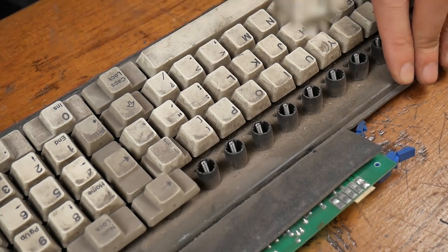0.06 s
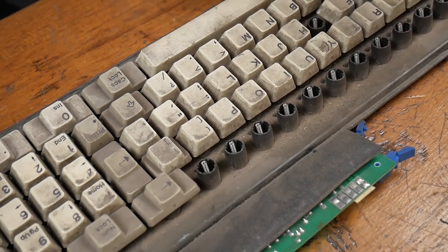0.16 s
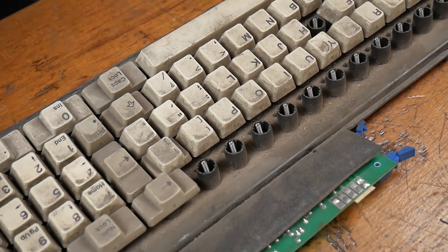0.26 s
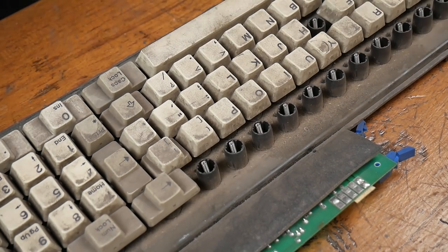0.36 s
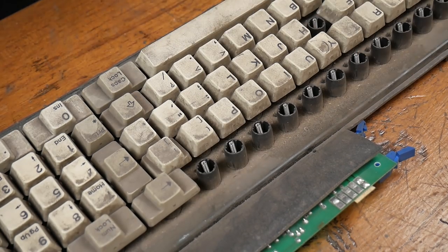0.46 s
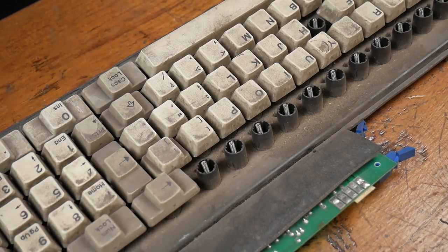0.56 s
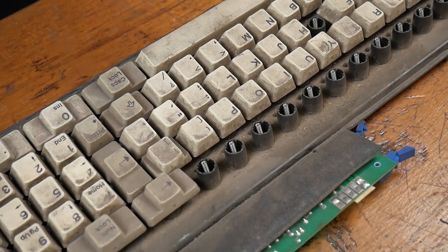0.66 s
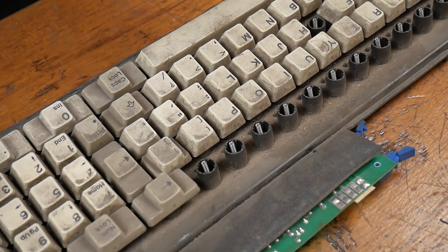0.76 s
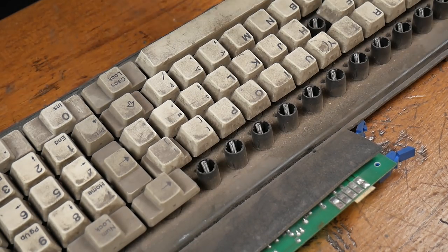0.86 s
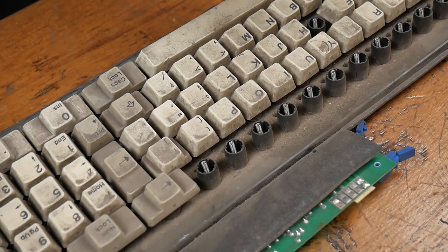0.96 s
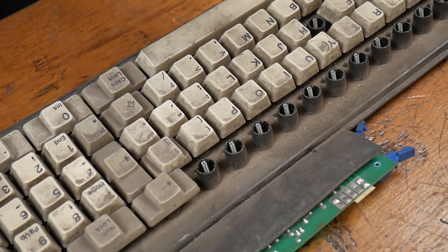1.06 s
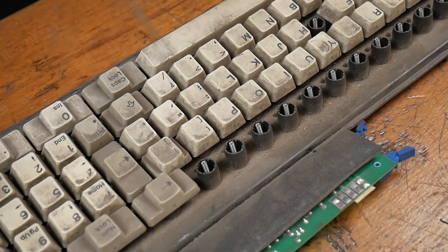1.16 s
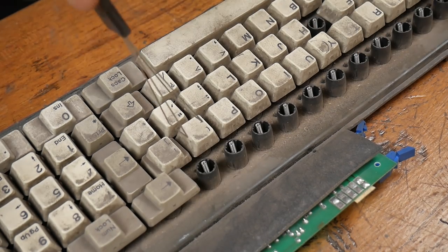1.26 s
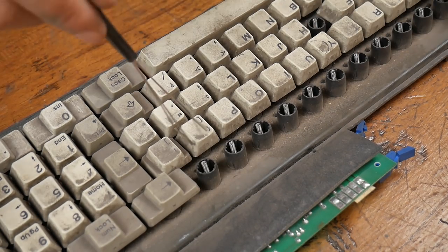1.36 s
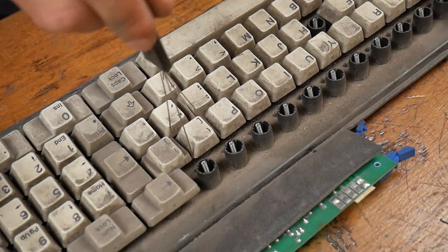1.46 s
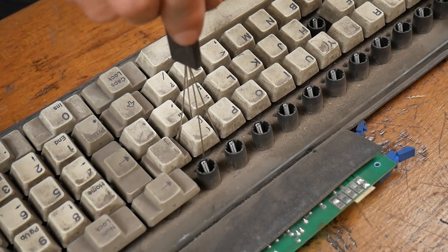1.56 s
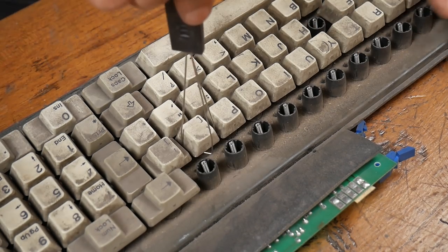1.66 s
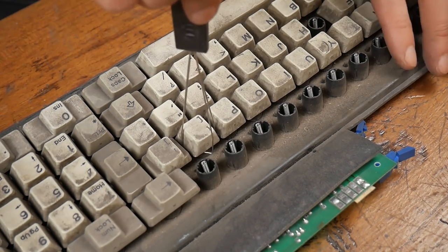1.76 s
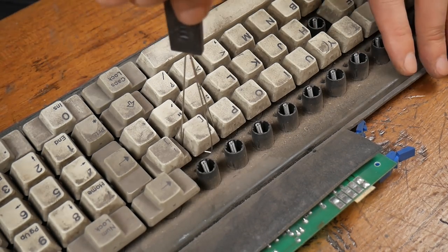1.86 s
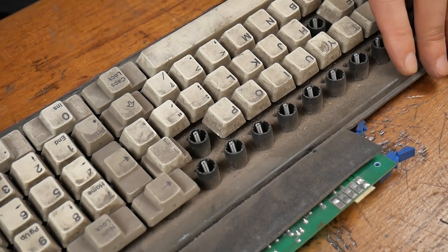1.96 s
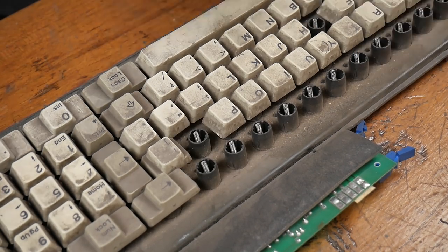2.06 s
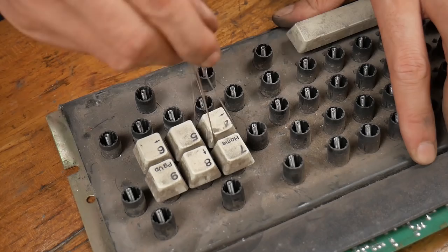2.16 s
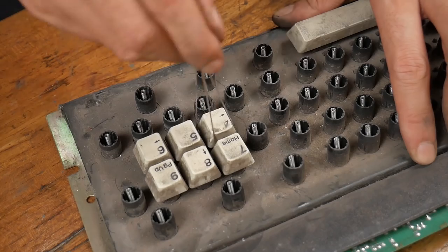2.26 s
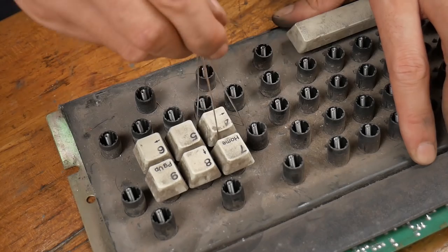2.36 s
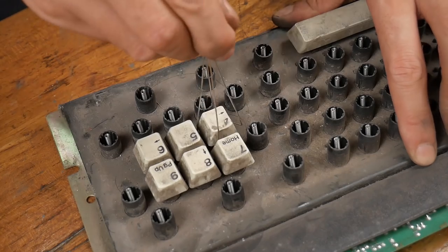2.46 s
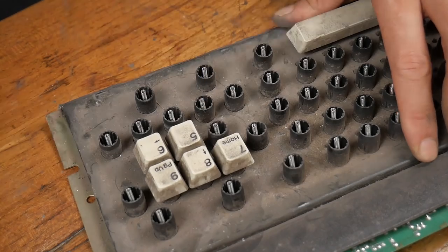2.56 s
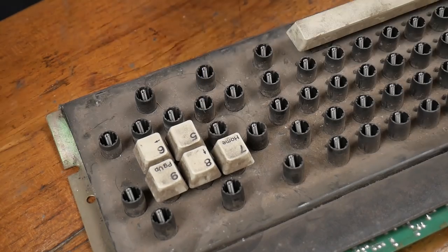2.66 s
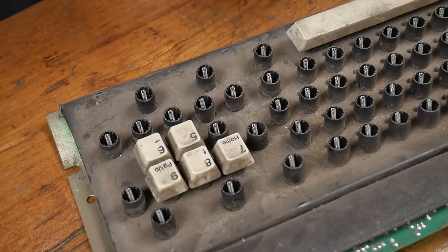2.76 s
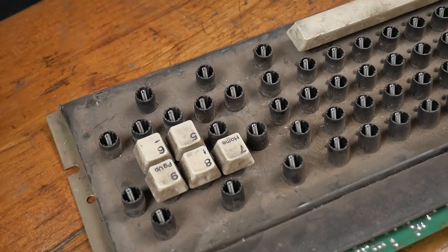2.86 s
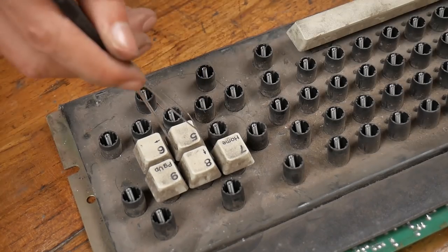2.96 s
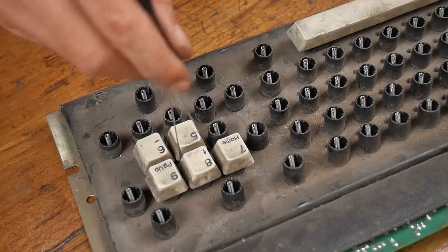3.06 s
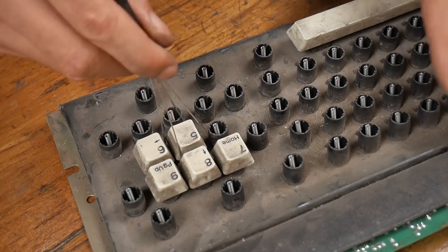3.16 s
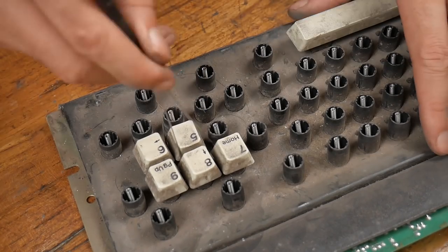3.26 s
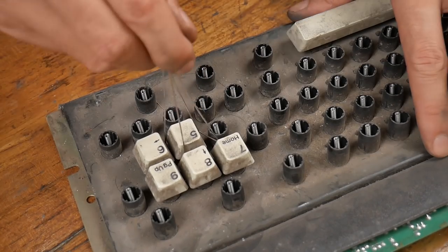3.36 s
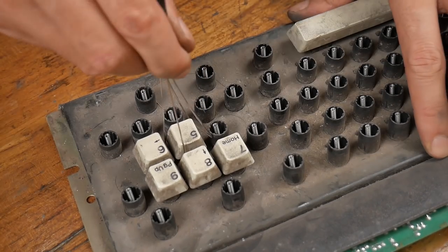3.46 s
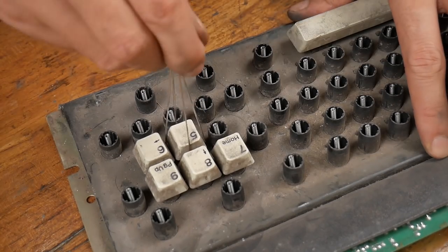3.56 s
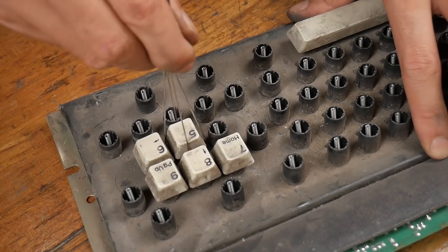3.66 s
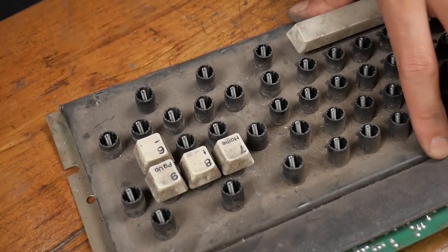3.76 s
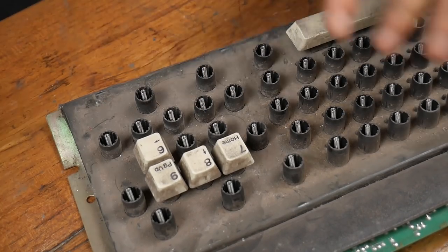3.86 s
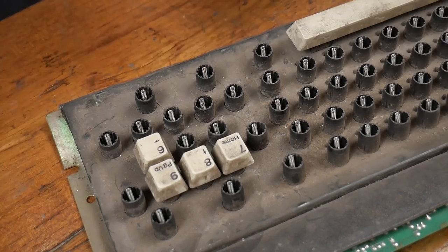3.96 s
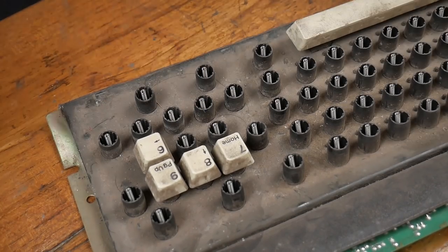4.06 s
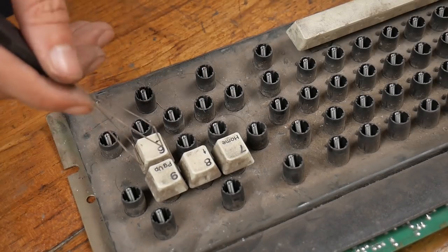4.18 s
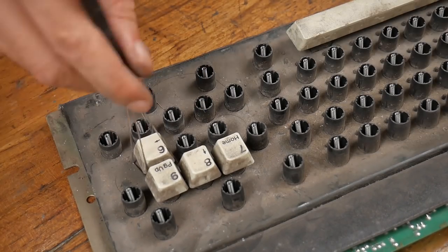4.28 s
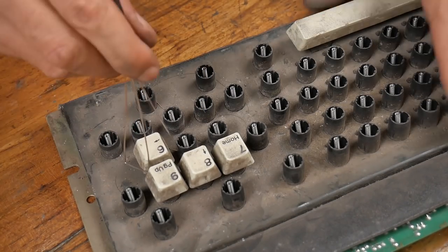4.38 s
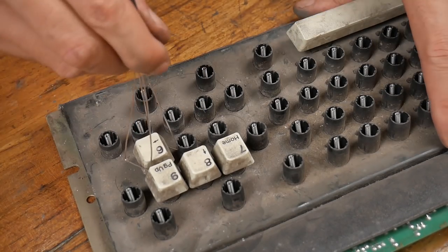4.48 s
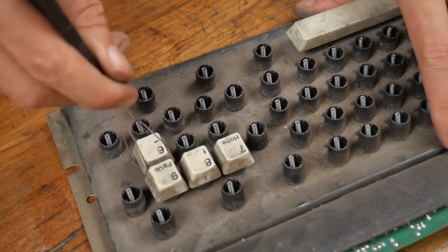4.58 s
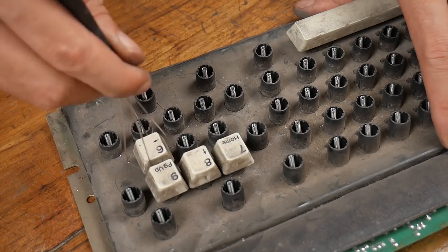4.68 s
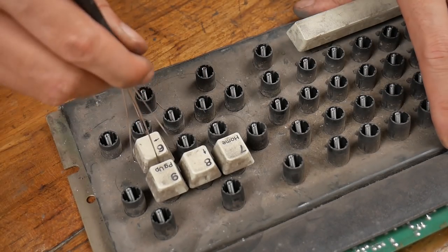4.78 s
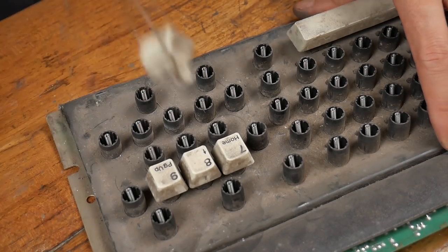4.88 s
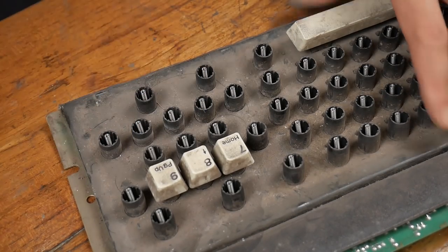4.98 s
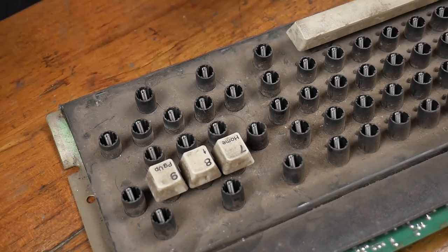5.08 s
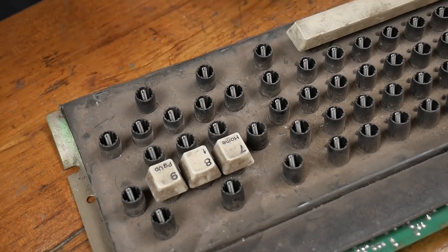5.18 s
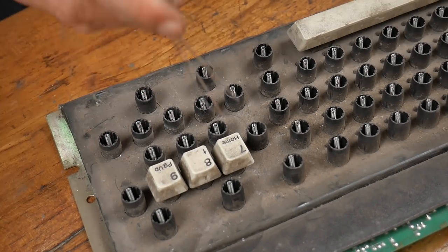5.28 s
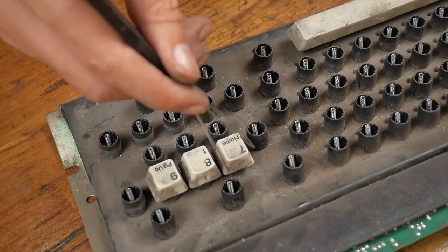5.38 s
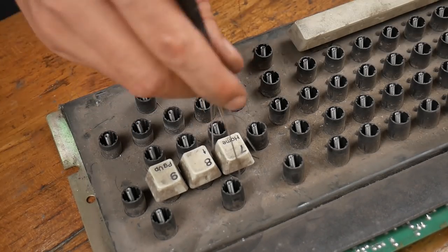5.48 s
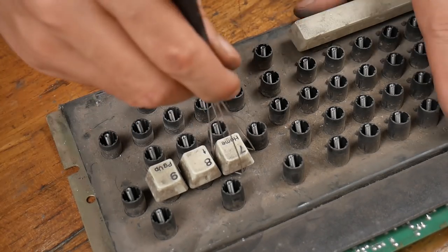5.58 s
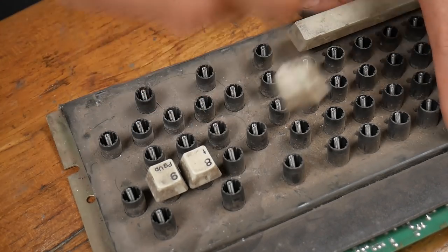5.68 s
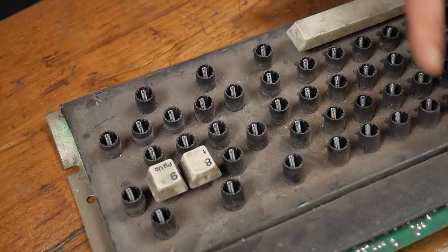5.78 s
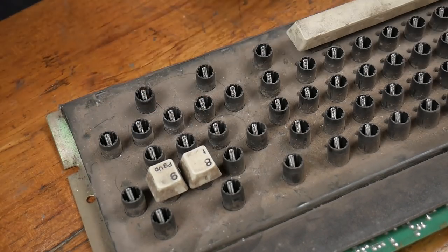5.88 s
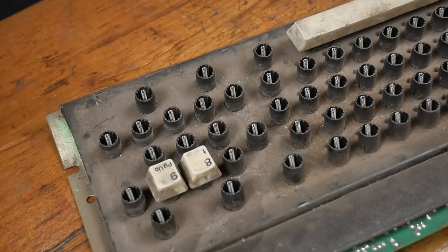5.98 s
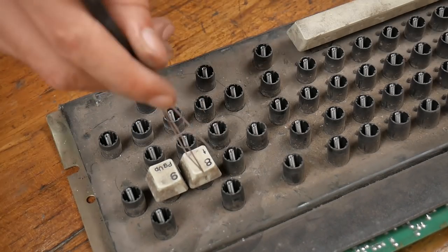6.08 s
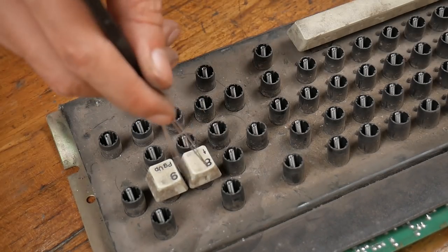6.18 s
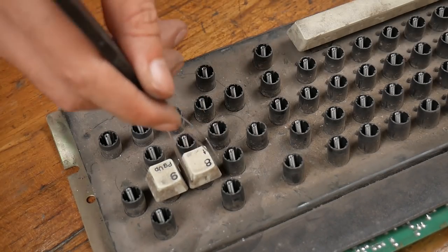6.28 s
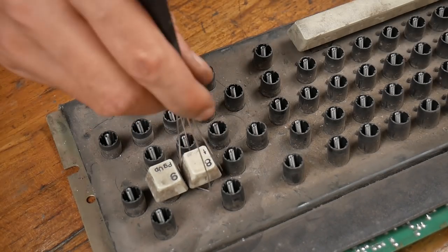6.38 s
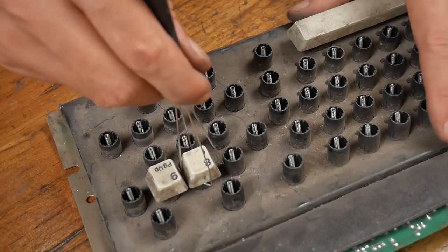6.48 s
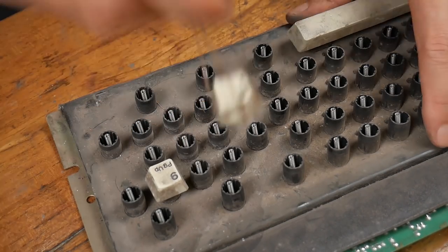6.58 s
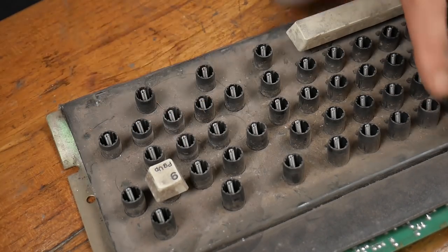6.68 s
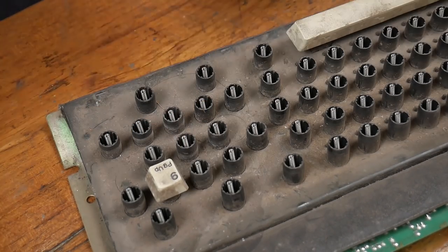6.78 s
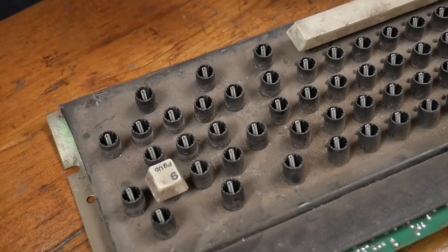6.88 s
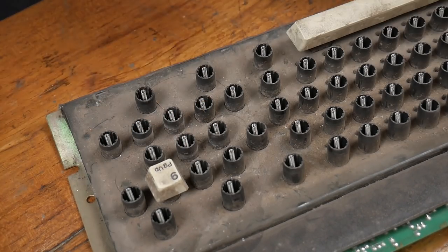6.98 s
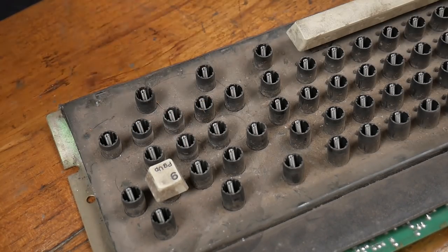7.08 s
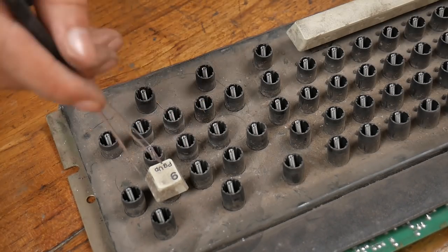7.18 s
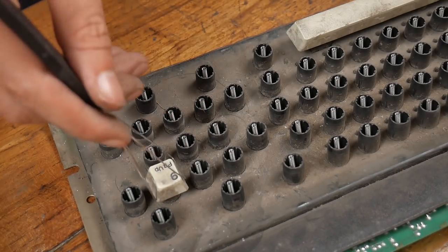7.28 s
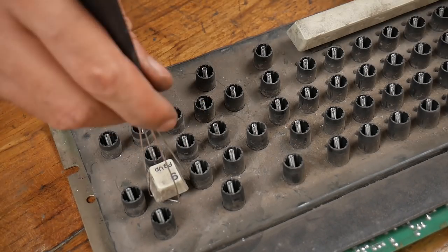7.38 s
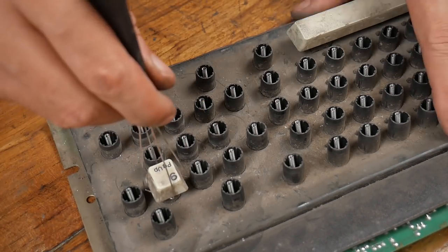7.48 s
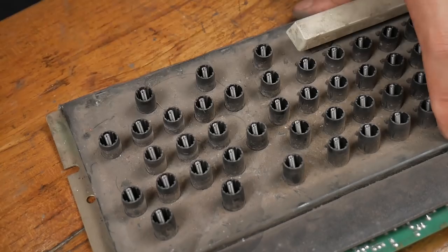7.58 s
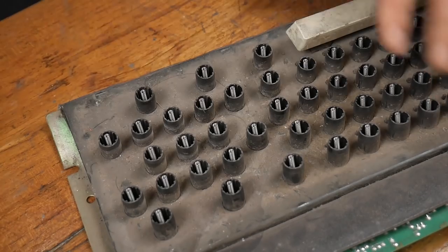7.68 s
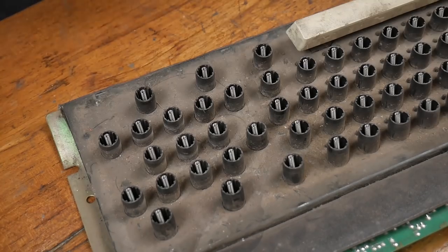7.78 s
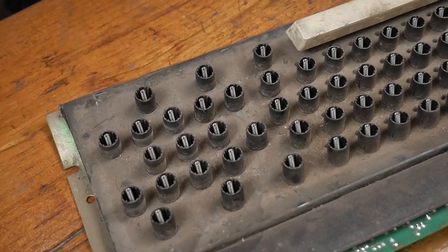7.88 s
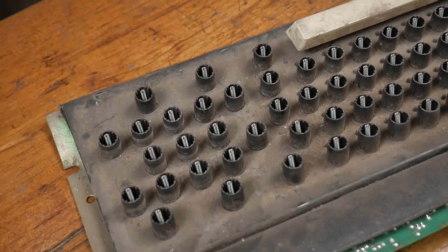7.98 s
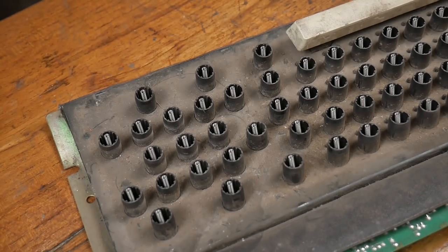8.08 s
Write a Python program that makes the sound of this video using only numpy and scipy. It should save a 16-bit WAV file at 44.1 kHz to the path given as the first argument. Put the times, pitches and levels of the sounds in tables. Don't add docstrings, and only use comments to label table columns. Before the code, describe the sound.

Close-up in a quiet small room, a wire puller works stiff plastic keycaps off an old keyboard on a wooden desk. Thin ticks and gritty scrapes lead to each sharp, hollow pop, with a short low boom from the desk. The tray slides back and lands lightly, then the next cap follows. Eight pops in about eight seconds, over faint hiss and hum.

```python
import sys
import numpy as np
from scipy import signal
from scipy.fft import rfft, irfft, next_fast_len
from scipy.io import wavfile
from scipy.ndimage import uniform_filter1d

SR = 44100
rng = np.random.default_rng(int(sys.argv[2]) if len(sys.argv) > 2 else 0)


def wrap_up_sound(samples):
    columns = np.atleast_2d(samples).T
    tamed = np.clip(columns, -1, 1)
    steps = np.round(tamed * 32767).astype(np.int16)
    wavfile.write(sys.argv[1], SR, steps)


def nominal_scale(level):
    x = np.asarray(level, float) / 20
    return 10 ** x


N = 358974


def evened(x):
    return x / np.sqrt(np.mean(x ** 2) + 1e-20)


def early(x):
    return x / np.sqrt(np.mean(x[:SR // 333] ** 2))


def read(points, hz):
    f, value = np.transpose(points)
    return np.interp(np.log(hz + 1), np.log(f + 1), value)


def add(mix, s, sound):
    part = mix[round(s * SR):][:len(sound)]
    part += sound[:len(part)]


def coloured(x, points):
    hz = np.fft.rfftfreq(len(x), 1 / SR)
    return irfft(rfft(x) * nominal_scale(read(points, hz)), len(x))


def resonate(x, hz, width_hz):
    turn = np.exp(2j * np.pi * np.cumsum(hz * np.ones(len(x))) / SR)
    r = np.exp(-np.pi * width_hz / SR)
    return 2 * (turn * signal.lfilter([1 - r], [1, -r], x / turn)).real


def resonate_twice(x, hz, width_hz):
    return resonate(resonate(x, hz, width_hz), hz, width_hz)


def band(x, lo_hz, hi_hz):
    return signal.sosfilt(signal.butter(2, [lo_hz, hi_hz], "band", fs=SR, output="sos"), x)


def dying_note(t, hz, db, t60_s, late_s=0):
    return nominal_scale(db - 60 * t / t60_s) * np.sin(2 * np.pi * hz * (t - late_s))


# [f/Hz, level/dB, t60/s]
KNOCK_MODES = [(512.6, 6.5, 0.029), (635, -4.5, 0.061), (898, -1.5, 0.02), (1890, 9, 0.0062)]


def tick(db, hz, bright_db, knock_db, noise):
    t = np.arange(len(noise)) / SR
    rattle_s = 0.00087 + 0.000017 * np.clip(db + 63, 0, 50)
    decay = np.exp(-(t / rattle_s) ** 2.5) + nominal_scale(-5) * np.exp(-t / 0.0037)
    burst = noise * decay * (1 - np.exp(-t / 0.0001))
    burst[8] = nominal_scale(12)

    bounce_s = 0.0006 * (1 + 0.13 * noise[0])
    bounce = 1 + nominal_scale(-8) * np.exp(-2j * np.pi * np.fft.rfftfreq(len(t), 1 / SR) * bounce_s)
    z = rfft(burst)
    flat = z / np.sqrt(uniform_filter1d(abs(z) ** 2, size=60))
    burst = irfft(bounce * flat) * (t < t[-1] / 2)

    body_lo_hz = np.clip(hz - 1700 - 40 * (db + 46.5), 2900, 4200)
    body = early(band(burst, body_lo_hz, 8920))
    shell = early(early(resonate_twice(burst, hz, 1300)) + nominal_scale(9.5 + 0.5 * bright_db) * body)
    socket = early(resonate_twice(burst, 3420, 1000))
    socket_db = -21.5 + 0.65 * knock_db + 0.071 * (db + 54.5)
    shell = early(shell + nominal_scale(socket_db) * socket)

    snap = early(band(burst, 6740, 12860))
    steel = sum(dying_note(t, *mode) for mode in KNOCK_MODES)
    knock = early(early(band(burst, 520, 1900)) + nominal_scale(-1) * steel)
    return nominal_scale(db) * early(shell + nominal_scale(bright_db) * snap + nominal_scale(knock_db - 4) * knock)


# [t/s, level/dB, ring f/Hz, brightness/dB, hollow knock/dB]
CAP_POPS = [
    (.0757, -28, 4900, -9, -4.5),
    (1.9545, -26.5, 4950, -24, -13.5),
    (2.5489, -26.5, 5250, -1.5, -5),
    (3.7769, -28, 5730, -3.5, -7),
    (4.9278, -29, 5620, -1, -7.5),
    (5.7349, -27.5, 3910, -3, -9.5),
    (6.632, -28, 5080, -6, -10.5),
    (7.616, -26.5, 4850, -2, -6),
]
# [t/s, level/dB, ring f/Hz, brightness/dB, hollow knock/dB]
RIM_SNAPS = [(0.0605, -45, 3180, -36, -5), (0.6969, -39.5, 5560, -11, -12.5), (0.7092, -38, 5300, -19, -23),
             (0.7158, -44, 5300, -15, -21), (0.731, -53, 5200, -12, -20), (0.7347, -53, 5310, -13, -21),
             (.7442, -62, 5300, -10, -15), (.7488, -57, 4300, -14, -16), (1.5966, -35.5, 5060, -13, -14),
             (1.63, -40.5, 4380, -77, -23), (2.2226, -42.5, 4770, -5, -9.5),
             (2.5073, -36.5, 5040, -6.5, -16), (2.8352, -44, 8910, -2, -35), (3.1019, -45, 5800, -6, -12),
             (3.139, -53, 5800, -3, -12), (3.141, -44, 5200, -6, -12), (3.3296, -43, 10200, 8, -7),
             (3.4359, -50.5, 4500, -32, 9), (3.5613, -30, 8700, -10, -23), (4.3859, -42, 8000, -0.5, -6),
             (4.452, -40, 8200, -5, -9), (4.7555, -41, 9150, 0, -6.5), (4.919, -28.5, 7500, 0, -15),
             (5.519, -40.5, 4560, -12, -7), (5.6178, -41.5, 4700, -5, -10), (6.2511, -33, 4300, -8, -14),
             (6.373, -49.5, 5540, -13, -2), (6.382, -49, 3750, -5, -9), (7.0725, -43.5, 6000, -1, -28),
             (7.5979, -43, 8300, -7.5, -34), (7.6047, -48.5, 4000, -1, -1), (8.1144, -42, 7650, -5.5, -9)]
# [t/s, level/dB, ring f/Hz]
WIRE_SLIPS = [(1.3812, -51.5, 4900), (1.4317, -50, 4900), (1.4898, -62, 4300), (1.5595, -52, 4240),
              (1.5819, -53, 4500), (1.5911, -62, 4120), (1.6415, -51, 4570), (1.6679, -53, 4400),
              (1.8755, -49.5, 3426), (2.2665, -59.5, 3460), (2.322, -63, 3380), (3.01, -57.5, 4900),
              (3.049, -60, 2930), (3.0644, -56, 5470), (3.269, -62, 3490), (3.334, -54, 3360),
              (3.4772, -58, 3400), (3.4848, -64, 3450), (4.2619, -54.5, 2860), (5.4791, -45, 3140),
              (5.5246, -46, 7330), (6.358, -58, 2900), (6.427, -58, 2500), (6.6175, -58, 3380),
              (6.722, -64, 3280), (7.2973, -48, 4900), (7.3735, -53.5, 9100)]
# [t/s, level/dB, ring f/Hz]
KEY_KNOCKS = [(.481, -52.5, 9300), (.9935, -53.5, 4900), (2.3732, -56, 3550), (3.0757, -50.5, 5260),
              (3.0921, -49.5, 3300), (3.1282, -52, 9600), (3.5535, -50.5, 4600), (4.3372, -48.5, 3400),
              (5.2032, -56, 7200), (5.4107, -51.5, 4400), (5.4376, -51.5, 5400), (5.5115, -42, 9300),
              (5.5334, -50, 5830), (6.3062, -51, 3120), (6.3947, -48, 4000), (6.4176, -52, 5630),
              (6.4848, -55, 5550), (7.3026, -44.5, 4860), (7.3233, -55, 7580), (7.3361, -67, 8740),
              (7.4616, -47, 5100)]
# [t/s, level/dB, ring f/Hz]
WIRE_TAPS = [(.1796, -54, 8200), (1.5161, -51.5, 4330), (2.4746, -59, 4500), (2.5141, -52, 5100),
             (2.6428, -56.5, 9500), (3.0676, -57, 3000), (3.2956, -45.5, 4900), (3.722, -47, 4840),
             (4.0792, -55.5, 8050), (4.3156, -50.5, 4900), (4.3716, -44.5, 9500), (4.6216, -44, 5400),
             (4.64, -45, 8300), (4.7322, -47, 3460), (4.9151, -51.5, 9000), (5.3998, -44.5, 4550),
             (5.4925, -55, 3060), (5.503, -43.5, 3300), (5.5155, -62, 4550), (5.5383, -48, 4520),
             (5.5484, -49, 7400), (5.5636, -58, 4480), (5.6407, -48, 6450), (5.7133, -49, 3400),
             (5.9939, -54, 7240), (6.1571, -49.5, 5300), (6.289, -49, 4820), (6.7307, -55.5, 4560),
             (7.9587, -58.5, 7330), (7.9707, -50.5, 9200)]
# [t/s, level/dB, ring f/Hz]
LIGHT_GRAZES = [(.1312, -54, 5470), (.2906, -85, 7000), (1.0852, -66.5, 4740), (1.4464, -78, 4080),
                (1.5402, -66, 4220), (1.5547, -56, 4100), (1.7148, -60, 9300), (1.8383, -54, 4640),
                (2.0535, -58, 9200), (2.3364, -58.5, 4650), (3.1948, -63, 4000), (3.24, -66, 5000),
                (3.3495, -59, 4650), (3.6519, -57, 4760), (3.8876, -57, 8200), (4.228, -63.5, 7500),
                (4.2755, -59, 9470), (4.533, -58, 4800), (4.6864, -63, 8270), (5.252, -61.5, 7060),
                (5.3928, -55.5, 5040), (5.591, -56, 4660), (5.6367, -55, 5680), (5.812, -58, 5240),
                (5.9567, -63, 3920), (6.2334, -56, 5100), (7.361, -53, 4660), (7.4091, -56, 4500),
                (7.7229, -64, 4500), (7.7426, -60, 8970)]
# [t/s, level/dB, ring f/Hz]
HAND_RUSTLES = [(.2974, -67, 6020), (.3274, -66, 11300), (.8937, -74, 8000), (1.0918, -70, 9050),
                (1.174, -70, 8750), (1.4974, -65, 7000), (1.7064, -66, 9000), (1.7734, -75, 9330),
                (1.7824, -72, 6050), (1.926, -70, 6500), (2.156, -70.5, 7540), (2.4446, -70.5, 5300),
                (2.6944, -77, 7800), (2.7356, -72, 7050), (2.7909, -73, 7270), (2.8088, -71, 9000),
                (2.9938, -68, 5010), (3.2033, -65, 5040), (3.2534, -64, 3400), (3.2888, -65, 4300),
                (3.312, -62, 4500), (3.4054, -62, 8000), (3.9017, -66, 7000), (3.9664, -70, 8800),
                (4.0365, -65, 7340), (4.2444, -71, 7520), (4.2578, -63, 6000), (4.7128, -70, 7000),
                (5.045, -58, 7560), (5.192, -87, 11700), (5.7245, -66, 7100), (5.9015, -73, 9270),
                (5.9675, -62, 7430), (6.2202, -64.5, 4280), (6.468, -67, 8000), (6.573, -67, 9500),
                (6.605, -70, 7000), (6.622, -81, 9000), (6.7414, -69, 8360), (6.7955, -67, 7500),
                (6.902, -71, 8600), (6.987, -72, 7650), (7.0174, -73, 9100), (7.5088, -54.5, 7480),
                (7.8067, -74, 7040), (7.8674, -71, 8700), (7.9034, -71, 9000), (7.9294, -73, 8430)]


def ticks():
    kinds = [  # table, brightness/dB, hollow knock/dB
        (WIRE_SLIPS, -21, -9.5),
        (KEY_KNOCKS, 4.5, -3.5),
        (WIRE_TAPS, 4.5, -10.5),
        (LIGHT_GRAZES, -5, -5),
        (HAND_RUSTLES, 2, -16.5)]
    rows = CAP_POPS + RIM_SNAPS
    for table, bright_db, knock_db in kinds:
        for s, db, hz in table:
            dulling_db = 17 * min(np.log2(hz / 7000), 0)
            rows = rows + [(s, db, hz, bright_db + dulling_db, knock_db)]
    out = np.zeros(N)
    noise = rng.standard_normal((len(rows), 2048))
    for (s, *colour), burst in zip(rows, noise):
        add(out, s, tick(*colour, burst))
    return out


# [f/Hz, level/dB per Hz]
SLIDE_COLOUR = [(290, -34), (500, -10), (678, -16), (1360, -18), (2930, -14.5), (6700, -15.5),
                (7750, -17.5), (13300, -15.5), (16000, -24.5)]


def drag(length_s, db, hz, ring_db, swell_db, chance):
    grains_per_s, spread_db, clump_db = 12000, 2.5, 2.5
    hit, size, sign, slow, drift = chance
    grains = (hit < grains_per_s / SR) * nominal_scale(-spread_db * np.log(size + 0.03)) * np.sign(sign - 0.5)
    grains *= nominal_scale(clump_db * evened(uniform_filter1d(slow - 0.5, 150)))
    ring_hz = hz * (1 + 0.035 * evened(uniform_filter1d(drift - 0.5, 500)))
    ring = evened(resonate_twice(grains, ring_hz, 1000))
    sound = evened(coloured(grains, SLIDE_COLOUR)) + nominal_scale(ring_db) * ring
    length = round(np.clip(length_s, 0.005, 0.14) * SR)
    swell = nominal_scale(swell_db * np.linspace(-0.5, 0.5, length))
    return nominal_scale(db) * evened(sound)[:length] * signal.windows.tukey(length, 0.4) * swell


# [t/s, length/s, level/dB]
ROUGH_RASPS = [(0.09, .074, -76), (0.341, 0.14, -78.5), (0.697, 0.063, -56.5), (3.04, 0.16, -65),
               (3.154, 0.016, -60.5), (3.2, 0.18, -75), (3.325, 0.14, -68.5), (4.248, 0.23, -66),
               (4.334, 0.028, -52.5), (5.435, 0.032, -54), (5.49, 0.094, -53), (6.257, 0.073, -61),
               (6.314, 0.15, -64.5), (6.41, 0.031, -62), (7.299, 0.17, -64.5), (7.803, 0.11, -73),
               (8.11, 0.027, -53)]
# [t/s, length/s, level/dB, ring f/Hz]
SHELL_RUBS = [(0.469, 0.032, -68, 10000), (0.87, 0.068, -80.5, 5340), (1.559, 0.098, -74, 4470),
              (1.708, 0.023, -70, 8100), (3.009, 0.024, -63.5, 3600), (3.061, 0.03, -62.5, 5060),
              (3.091, .04, -65, 5300), (3.207, 0.16, -82, 4470), (3.475, 0.076, -68.5, 4300),
              (4.512, 0.035, -70, 8100), (5.647, 0.05, -66, 8440), (6.435, 0.066, -66, 3500),
              (6.538, 0.023, -66.5, 8060), (7.512, 0.019, -62.5, 7640), (7.96, 0.047, -78, 7900)]
# [t/s, length/s, level/dB, ring f/Hz, landing/dB]
TRAY_SETTLES = [
    (0.174, 0.014, -63, 4600, -45.5),
    (2.037, 0.046, -67, 5540, -44.5),
    (2.629, 0.033, -65.5, 4900, -42),
    (3.875, 0.026, -62.5, 4300, -44.5),
    (5.032, 0.021, -64, 8500, -59),
    (5.814, 0.0366, -73.5, 5100, -48),
    (6.711, 0.029, -66, 7500, -47.5),
    (7.708, 0.026, -65, 7800, -52.5),
]
# [t/s, length/s, level/dB, ring f/Hz]
WIRE_SQUEAKS = [
    (1.382, .014, -68, 5000),
    (1.423, .016, -59, 4400),
    (1.431, .135, -66.5, 4300),
    (1.484, .014, -60, 4400),
    (1.566, .125, -66, 4600),
]


def drags():
    rows = [(*row, 4900, -13, -8) for row in ROUGH_RASPS]
    rows += [(*row, -2.5, -6) for row in SHELL_RUBS]
    rows += [(*row[:4], -6, 5) for row in TRAY_SETTLES]
    rows += [(*row, 12, -8) for row in WIRE_SQUEAKS]
    out = np.zeros(N)
    for s, *stroke in rows:
        add(out, s, drag(*stroke, rng.random((5, SR // 7))))
    return out


# [t/s, level/dB, f/Hz]
FREE_CLACKS = [(0.077, -51, 915), (0.076, -58, 1885), (0.145, -64, 1885), (.71, -60, 5313),
               (1.38, -59, 4500), (1.597, -59, 636), (1.598, -60, 5700), (1.84, -62, 630),
               (2.026, -69, 1885), (2.374, -54, 493), (2.838, -67, 4640), (3.091, -56, 420),
               (3.4365, -49, 624), (3.565, -57.5, 1590), (4.733, -55.5, 9000), (6.253, -57, 1730),
               (6.254, -58, 3750), (6.395, -67, 1610), (7.074, -60, 4877), (7.074, -56, 5550),
               (7.6053, -65, 640), (7.617, -41.5, 685)]


def clacks():
    t = np.arange(SR // 5) / SR
    out = np.zeros(N)
    for s, db, hz in FREE_CLACKS:
        add(out, s, dying_note(t, hz, db, 0.079))
    return out


# [f/Hz, level/dB, t60/s]
PLATE_MODES = [(1885, 6.5, .12), (3140, -7.5, 0.11), (3750, 4, 0.18), (4300, -5, .09), (4530, 2.5, 0.12),
               (4870, -3, 0.03), (5600, -3.5, 0.12), (5670, 5, .12), (7560, 0.5, 0.045)]


def plate(x):
    t = np.arange(SR // 6) / SR
    ring = sum(dying_note(t, *mode) for mode in PLATE_MODES)
    return signal.oaconvolve(x, ring / np.linalg.norm(ring))[:N]


# [t/s, strength/dB, lean to upper modes/dB, tray/dB]
DESK_HEAVES = [(0.0765, -22, -0.3, 8), (1.5998, -34.5, -6, -12), (1.6721, -34.5, -3, -6),
               (1.9554, -22.5, -1, -22), (1.9724, -33, 1, -1), (2.3775, -33.5, -2.5, 9.5),
               (2.5496, -21.5, 0.3, 1), (3.097, -30.5, -4, 8.5), (3.1639, -35, 1.5, 4),
               (3.339, -34.5, 3.5, -10), (3.4404, -36.5, 3.5, -10), (3.564, -36, 4.5, 7),
               (3.7763, -21, -0.5, -3), (4.3341, -35.5, 2.5, 3), (4.3905, -28.5, -2.5, -16),
               (4.6278, -40, 10, 0), (4.735, -29.5, -1, -10), (4.9272, -21, 1, -19), (5.4397, -38.5, 5, 5),
               (5.5248, -32, 4.5, -10), (5.621, -31.5, -4, 1), (5.7353, -22.5, -1, -22),
               (6.4028, -29, -2.5, 7), (6.487, -32.5, -4.5, -15), (6.632, -20.5, -0.5, -4),
               (7.3767, -30, -2, 2), (7.4648, -31.5, 0.5, -12), (7.617, -21, 0.5, 2)]
# [t/s, strength/dB, lean to upper modes/dB, tray/dB]
SOFTER_HEAVES = [(1.5569, -43.5, 10, -5), (1.634, -55, -1, -5), (1.887, -42, -1, -2),
                 (2.226, -39.5, 8.5, -2), (2.2557, -44.5, 3, 0), (2.334, -41.5, 5, -5),
                 (2.5061, -38, 1.5, 14), (3.025, -40, -5, -14), (3.2579, -42.5, -2, -6),
                 (3.2939, -38.5, -11, 8), (3.6293, -39.5, -6, -5), (3.7263, -41, 3, -5),
                 (4.3063, -44, -10, 11), (4.3514, -39.5, 5, -2), (4.45, -39.5, -10, 11),
                 (4.8314, -42, 3.5, -10), (4.8446, -44.5, 1, .1), (4.9673, -48, 14, -2),
                 (5.4022, -40, -11.5, 7), (5.5007, -38, -9, -3), (5.5589, -44, 9, 0),
                 (6.255, -45.5, 11.5, -4), (6.2903, -38.5, 0.5, 7), (6.3252, -44.5, 7, .1),
                 (6.336, -44.5, -5.3, .1), (6.389, -42, -1, -3), (6.545, -44, -5, -6), (7.514, -40, -2, -4),
                 (7.599, -38, -11, 6)]
# [t/s, strength/dB]
FINGER_NUDGES = [(.002, -52.5), (0.7091, -52.5), (0.843, -59), (0.9947, -49.5), (1.3815, -48), (1.435, -46),
                 (1.517, -48.5), (1.7275, -54), (1.8418, -47), (3.061, -53), (3.228, -49), (3.516, -47.5),
                 (4.248, -50), (4.4891, -47), (4.546, -49.5), (4.5853, -47.5), (4.6871, -49),
                 (6.159, -46.5), (6.2092, -46.5), (6.5794, -46), (7.299, -49), (7.332, -51), (7.873, -55.5),
                 (8.114, -56)]


def jolts():
    light = FINGER_NUDGES + [(s + length / 2, db) for s, length, *_, db in TRAY_SETTLES]
    blows, lean_db, tray_db = np.zeros((3, N))
    for s, db, lean, tray in DESK_HEAVES + SOFTER_HEAVES + [(*row, 0, 0) for row in light]:
        add(blows, s, np.array([nominal_scale(db)]))
        add(lean_db, s, np.array([lean]))
        add(tray_db, s, np.array([tray]))
    return blows, lean_db, tray_db


# [f/Hz, level/dB, t60/s, travel/ms (negative = against the blow)]
DESK_MODES = [(139.4, -17.5, .27, -2.85), (161.7, -3.2, .19, -1.3), (189.8, 1.9, .16, .97),
              (212.9, -10.6, .2, 1.39)]
# [f/Hz, level/dB, t60/s]
SWAY_MODES = [(92.1, -30, 0.44), (135, -32, 0.54), (234.6, -29.5, 0.54), (497, -26, 0.092),
              (915, -51.5, 0.12), (1244, -46.5, 0.18), (1885, -51.5, 0.081)]
# [f/Hz, level/dB, t60/s]
TRAY_MODE = (285.6, -14.5, 0.095)
# [f/Hz, level/dB, t60/s]
ROCKING_MODE = (35, -34.5, 0.7)
# [f/Hz, level/dB, t60/s]
LEG_MODE = (95, -22, .2)


def desk():
    t = np.arange(SR // 2) / SR
    blows, lean_db, tray_db = jolts()
    popped = blows > nominal_scale(-26)
    modes = [np.sign(ms) * dying_note(t, hz, db, t60, abs(ms) / 1000) for hz, db, t60, ms in DESK_MODES]
    push = 1 - np.exp(-(t / 0.00556) ** 2)
    snap = 1 - np.exp(-(t / 0.007) ** 5)
    snap = snap * nominal_scale(-40 * np.maximum(t - 0.06, 0))

    sway = sum(dying_note(t, *mode) for mode in SWAY_MODES)
    ring = signal.fftconvolve(blows * popped, sway)
    for pair, side in ((modes[0] + modes[1], -0.5), (modes[2] + modes[3], 0.5)):
        leaning = blows * nominal_scale(side * lean_db)
        ring += signal.fftconvolve(leaning * ~popped, pair * push)
        ring += signal.fftconvolve(leaning * popped, pair * snap)

    drum = dying_note(t, *TRAY_MODE) * (1 - np.exp(-t / 0.026))
    ring += signal.fftconvolve(blows * nominal_scale(tray_db), drum)
    ring += signal.fftconvolve(blows * ~popped, dying_note(t, *LEG_MODE) * push)

    rocking = dying_note(t, *ROCKING_MODE) * (1 - np.exp(-t / 0.075))
    rocking_blows = blows * nominal_scale(2.8 * ~popped)
    return band(ring[:N], 55, 4000) + signal.fftconvolve(rocking_blows, rocking)[:N]


def blurred(x):
    wander_hz = 450 * evened(uniform_filter1d(rng.standard_normal(N), size=30))
    turn = np.exp(2j * np.pi * np.cumsum(wander_hz) / SR)
    return (signal.hilbert(x, next_fast_len(N))[:N] * turn).real


# [f/Hz, t60/s]
ROOM_T60 = [(400, 0.48), (1500, 0.17), (4800, 0.29), (9000, 0.19), (15000, 0.26)]
# [f/Hz, level/dB]
WALL_COLOUR = [(500, 5.5), (2500, 0.5), (3600, -7), (5000, -1.5), (6500, -4.5), (9500, -0.5), (15000, -1.5)]


def room(x):
    length = SR // 3
    out = np.zeros(N)
    for k in range(3):
        echoes = np.zeros(length)
        at = np.arange(120, length - 20, 20)
        echoes[at + rng.integers(0, 20, len(at))] = rng.choice([-1., 1.], len(at))
        hz, t, z = signal.stft(echoes, SR, nperseg=128)
        decay = nominal_scale(-60 * t / read(ROOM_T60, hz)[:, None])
        tail = signal.istft(z * decay, SR, nperseg=128)[1]
        share = np.cos(np.pi * (7 * np.arange(N) / SR + k / 3)) * np.sqrt(2 / 3)
        out += signal.fftconvolve(x * share, tail / np.linalg.norm(tail))[:N]
    return coloured(out, WALL_COLOUR)


# [f/Hz, level/dB per Hz]
HISS_COLOUR = [(22, -27), (38, -6), (70, -14.5), (187, -7), (300, -15.5), (400, -11.5), (650, -19.5),
               (900, -18.5), (5000, -31), (9300, -37.5), (10300, -26.5), (11600, -23), (12300, -40.5),
               (16500, -43)]
# [f/Hz, level/dB]
HUM_LINES = [(360.5, -78.5), (436, -84), (11210, -100)]


def air():
    t = np.arange(N) / SR
    out = nominal_scale(-72.5) * evened(coloured(rng.standard_normal(N), HISS_COLOUR))
    for hz, db in HUM_LINES:
        waver = evened(uniform_filter1d(rng.standard_normal(N), 4000))
        out += np.sqrt(2) * nominal_scale(db + 1.9 * waver) * np.sin(2 * np.pi * hz * t + 0.076 * waver)
    return out


def scene():
    contacts = ticks() + drags()
    near = contacts + nominal_scale(-30) * plate(contacts) + clacks()
    walls = room(band(blurred(near), 600, 15000))
    return (near + nominal_scale(-14) * walls + desk() + air())[None]


GATE_EDGES_HZ = [12100, 12800, 13500, 14200, 15000, 15900, 16800, 22100]
GATE_OPENS_DB = [3.2, 3.2, 3, 2.5, 1.5, 12, 99]


def treble_gate(x):
    hz, _, z = signal.stft(x, SR, nperseg=2048, noverlap=1024)
    gain = np.ones(z.shape)
    hiss_db = None
    for lo, hi, opens_db in zip(GATE_EDGES_HZ, GATE_EDGES_HZ[1:], GATE_OPENS_DB):
        rows = (hz >= lo) & (hz < hi)
        level_db = 10 * np.log10(np.mean(abs(z[rows]) ** 2, axis=0) + 1e-20)
        if hiss_db is None:
            hiss_db = np.percentile(level_db, 12)
        gain[rows] = np.where(level_db > hiss_db + opens_db, 1, nominal_scale(-32))
    return signal.istft(z * gain, SR, nperseg=2048, noverlap=1024)[1][:N]


def top_cut(x):
    return signal.sosfilt(signal.butter(12, 16870, fs=SR, output="sos"), x)


def record(dry):
    edge = signal.firwin(63, 16300, fs=SR)
    rolled_off = signal.oaconvolve(dry[0], edge, "same")
    mix = treble_gate(rolled_off)[None]
    return top_cut(mix)


dry = scene()
out = record(dry)
wrap_up_sound(out)
```